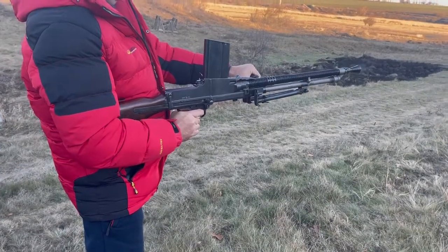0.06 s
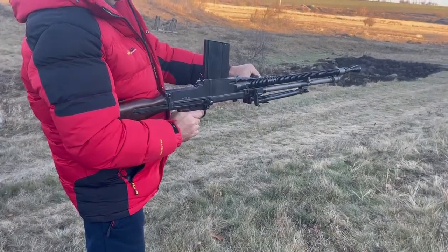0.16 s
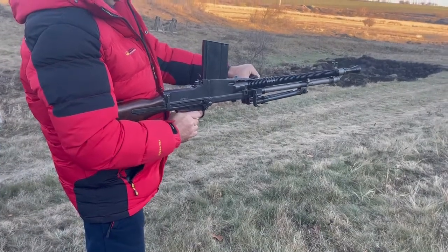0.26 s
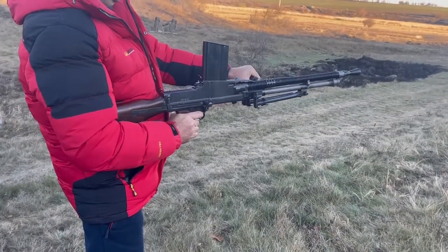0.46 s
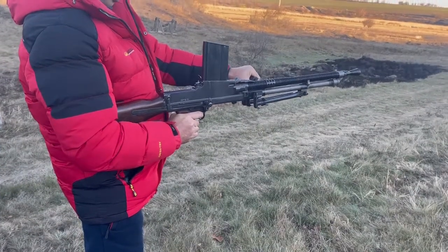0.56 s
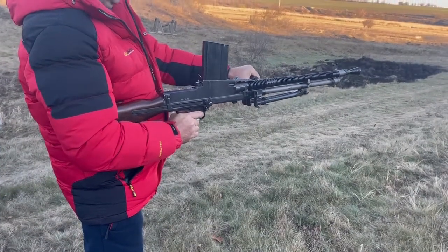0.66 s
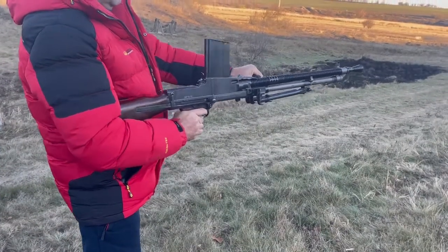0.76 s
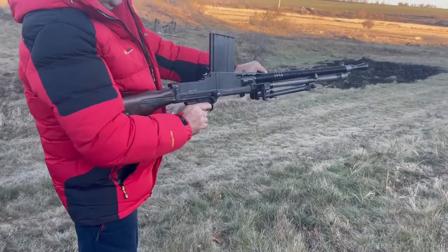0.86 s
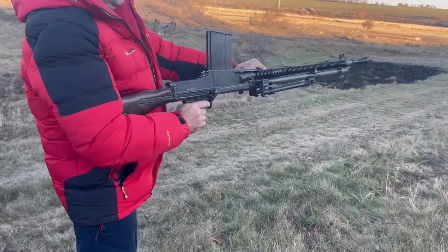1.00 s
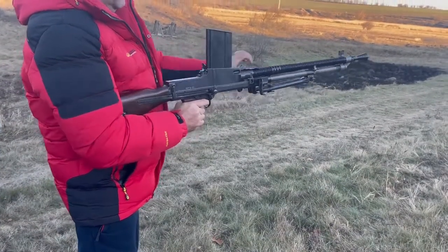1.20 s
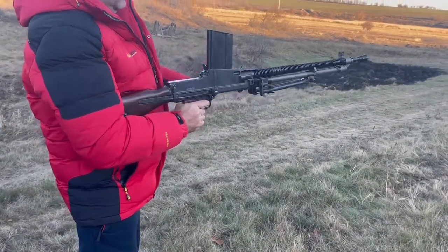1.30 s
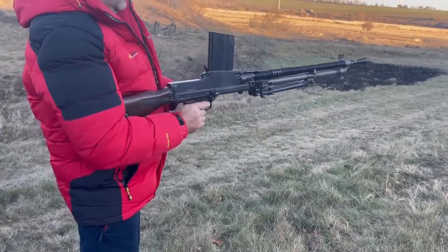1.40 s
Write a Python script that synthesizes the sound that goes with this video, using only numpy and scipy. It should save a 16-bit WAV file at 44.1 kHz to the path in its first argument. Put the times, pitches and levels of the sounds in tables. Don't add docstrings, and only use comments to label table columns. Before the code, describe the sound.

A single close machine gun shot: steel bolt clatter runs straight into one short thumping blast, then a dull echo off slopes fades quickly under low wind buffeting, heard on a phone in an open field.

```python
import sys
import numpy as np
from scipy import signal
from scipy.fft import rfft, irfft
from scipy.io import wavfile
from scipy.ndimage import uniform_filter1d, map_coordinates

SR = 44100
rng = np.random.default_rng(int(sys.argv[2]) if len(sys.argv) > 2 else 0)


def decibels_to_gain(level_db):
    exponent = np.asarray(level_db, float) / 20
    return 10 ** exponent


def wav_out(sig):
    wavfile.write(sys.argv[1], SR, np.round(np.clip(np.atleast_2d(sig).T, -1, 1) * 32767).astype(np.int16))


N = 63945

# time_s, level_db
OLD_ECHO_LEVEL = [
    (0.0, -51),
    (0.006, -49.5),
    (0.124, -64.5),
    (0.195, -61.5),
]
# time_s, level_db
ECHO_LEVEL = [
    (.30, -52.5),
    (.34, -54.5),
    (.406, -53.5),
    (.45, -44.5),
    (.51, -49.5),
    (.572, -56),
    (.66, -62),
    (.76, -71),
    (1.12, -79),
]
# frequency_hz, density_db (per Hz)
ECHO_SPECTRUM = [(180, -34), (300, -8.5), (1050, 2.5), (1280, -5.5), (2180, -4), (3590, -15.5),
                 (8730, -20.5), (11400, -43.5), (12500, -60), (16200, -92), (22000, -120)]
# frequency_hz, density_db (per Hz)
AIR_SPECTRUM = [(410, -43), (700, -10.5), (1410, -1), (1670, -12), (2170, -12.5), (8400, -24.5),
                (12500, -29), (16200, -56), (22000, -120)]
AIR_LEVEL_DB = -93.5
ECHO_DULLING_DB_S, ECHO_PATCHINESS_DB = -4.5, .8

# time_s, level_db
GUST_LEVEL = [(0, -52), (.11, -49), (.19, -45), (.34, -44), (.41, -48), (.45, -43), (.57, -54.5),
              (.64, -46), (.72, -47.5), (.80, -57.5), (.86, -63), (.96, -48.5), (1.05, -63), (1.12, -67),
              (1.17, -51), (1.29, -47), (1.34, -51.5), (1.45, -51.5)]
# frequency_hz, density_db (per Hz)
WIND_SPECTRUM = [(20, -14.5), (40, -8), (70, -1.5), (150, -2.5), (230, -11), (330, -25.5), (500, -42),
                 (900, -61)]
FLUTTER_DB = 2.5

# time_s, level_db
INSECT_LEVEL = [
    (0, -75),
    (.2, -76),
    (.35, -88),
    (.8, -95),
    (1.0, -103),
    (1.45, -115),
]
INSECT_HZ = 5324

# start_s, peak_db, pitch_hz, t60_s
EDDIES = [(.136, -37, 403, 0.035), (0.142, -32, 239, .08), (0.328, -36.5, 300, 0.18),
          (0.427, -43.5, 350, 0.11), (.51, -44, 352, 0.072), (.625, -44.5, 300, 0.077),
          (0.654, -49.5, 300, 0.11), (0.721, -47.5, 398.7, 0.047), (.739, -32, 334, 0.048),
          (0.747, -43, 316, 0.084), (0.945, -44, 300, 0.088), (0.961, -45, 370.5, 0.068),
          (1.006, -53, 300, 0.044), (1.147, -44.5, 391, 0.046), (1.18, -50.5, 250, 0.05),
          (1.214, -56, 300, 0.075), (1.243, -52.5, 333, 0.079), (1.259, -47.5, 387, 0.072),
          (1.318, -49.5, 327.4, 0.067), (1.339, -47, 440, 0.049), (1.349, -53.5, 410, 0.11),
          (1.393, -53, 373, 0.047), (1.416, -51.5, 300, 0.08)]
SLAP_RISE_S, SLAP_Q = .0023, 1

# start_s, level_db, ring_hz, t60_s
METAL_KNOCKS = [(.152, -58, 3500, .03), (.2022, -35.5, 2600, .035), (.2140, -20.5, 11000, .015),
                (.2175, -27.5, 6000, .035), (.2225, -39, 5500, .03), (.229, -36.5, 8500, .035),
                (.2365, -28.5, 8200, .05), (.2447, -12, 8800, .02), (.249, -26, 11000, .03),
                (.2565, -25, 2000, .05), (.259, -25, 6300, .04), (.2645, -25, 8600, .05),
                (.266, -23, 11200, .06), (.272, -25, 8400, .06), (.280, -28.5, 2400, .04),
                (.295, -37, 5200, .04), (.3075, -40, 3500, .05), (.318, -40, 7000, .05),
                (.833, -68, 4000, .03), (.874, -56.5, 2500, .03), (1.077, -77, 1500, .03),
                (1.4485, -70, 2000, .05)]
# frequency_hz, density_db (per Hz)
STEEL_SPECTRUM = [(350, -49.5), (600, -12.5), (1170, -1.5), (1800, -12), (2210, -6.5), (3940, -10),
                  (10000, -8.5), (11000, 0), (12300, -16.5), (16000, -45.5), (22000, -120)]
# time_s, level_db
SCRAPE_LEVEL = [
    (.200, -72),
    (.204, -44.5),
    (.24, -38),
    (.27, -32),
    (.295, -43),
    (.322, -44),
    (.330, -61.5),
    (.35, -79.5),
]
RING_Q, CRACK_DB, KNOCK_RISE_S = 6, -9.5, .0005

# time_s, pitch_hz, level_db
BLAST_SWING = [
    (.262, 620, -35.5),
    (.2675, 520, -15),
    (.2695, 330, -7),
    (.2725, 190, -7),
    (.2752, 150, -6.5),
    (.280, 95, -15.5),
    (.288, 90, -14.5),
    (.298, 80, -30),
    (.315, 70, -49.5),
]
# frequency_hz, level_db, centre_s, half_width_s
FRONT_ROAR = [
    (470, -18.5, .265, .007),
    (1030, -17.5, .264, .006),
    (1950, -25.5, .260, .005),
    (300, -22.5, .282, 0.011),
]
BLAST_ROUGHNESS = .05
HEAVE_S, HEAVE_HZ, HEAVE_DB, HEAVE_FADE_S = .2725, 38, -10, .012

# frequency_hz, gain_db
PORT_RESPONSE = [(130, -30.5), (250, -2), (600, 6.5), (2000, -9), (6000, -10), (9000, -0.5), (11000, 1.5),
                 (12500, -8)]
PORT_LAG_S, PORT_DRIFT_PER_S = .00025, -1.2
SIDE_FROM_HZ, GUN_PAN = 360, .058
ACTION_SIDE_DB, ECHO_SIDE_DB, WIND_SIDE_DB, SLAP_SIDE_DB = -5, 1, -13.5, -7.5
TOP_HZ = 11750


def line(table, col=1):
    rows = np.array(table)
    return np.interp(np.arange(N) / SR, rows[:, 0], rows[:, col])


def unit(x):
    return x / np.sqrt(np.mean(x ** 2))


def colour(x, points, floor_db=-60):
    rows = np.array(points)
    hz = np.maximum(np.fft.rfftfreq(len(x), 1 / SR), 1)
    knots_hz = np.r_[rows[0, 0] / 2, rows[:, 0], rows[-1, 0] * 2]
    knots_db = np.r_[floor_db, rows[:, 1], floor_db]
    gain_db = np.interp(np.log(hz), np.log(knots_hz), knots_db)
    return irfft(rfft(x) * decibels_to_gain(gain_db), len(x))


def band(x, hz, q):
    b, a = signal.iirpeak(min(hz, .45 * SR), max(q, .3), fs=SR)
    return signal.lfilter(b, a, x)


def walk(rate_hz):
    hold = int(SR / rate_hz)
    steps = np.repeat(rng.standard_normal(N // hold + 1), hold)
    return 1.2 * uniform_filter1d(steps, hold)[:N]


def burst(start_s, db, t60_s, rise_s):
    age = np.maximum(np.arange(N) / SR - start_s, 0)
    rise = 1 - np.exp(-(age / rise_s) ** 2)
    return rise * decibels_to_gain(db - 60 * age / t60_s)


def echoes():
    t = np.arange(N) / SR
    old = t < .25
    level = np.where(old, line(OLD_ECHO_LEVEL), line(ECHO_LEVEL))
    age = np.where(old, t, t - .3)
    wash = unit(colour(rng.standard_normal(N), ECHO_SPECTRUM))
    out = np.zeros(N)
    for octave in range(6):
        centre_hz = 350 * 2 ** octave
        edges = [centre_hz / 1.414, min(centre_hz * 1.414, .45 * SR)]
        part = signal.sosfilt(signal.butter(2, edges, "bandpass", fs=SR, output="sos"), wash)
        dulling = ECHO_DULLING_DB_S * octave * (age - .4031)
        out += part * decibels_to_gain(level + dulling + ECHO_PATCHINESS_DB * walk(40))
    return out + decibels_to_gain(AIR_LEVEL_DB) * unit(colour(rng.standard_normal(N), AIR_SPECTRUM))


def wind():
    rumble = colour(rng.standard_normal(N), WIND_SPECTRUM)
    total = np.zeros(N)
    for hz in 30 * 2. ** np.arange(5):
        total += band(rumble, hz, 1.5) * decibels_to_gain(FLUTTER_DB * walk(30))
    return unit(total) * decibels_to_gain(line(GUST_LEVEL))


def insect():
    tone = np.sin(2 * np.pi * INSECT_HZ * np.arange(N) / SR)
    return np.sqrt(2) * decibels_to_gain(line(INSECT_LEVEL) + 1.5 * walk(25)) * tone


def slaps():
    noise = rng.standard_normal(N)
    out = np.zeros(N)
    for start_s, db, hz, t60_s in EDDIES:
        rough = band(band(noise, hz, SLAP_Q), hz, SLAP_Q)
        eddy = np.tanh(1.9 * unit(rough))
        out += burst(start_s, db, t60_s, SLAP_RISE_S) * eddy
    return signal.sosfilt(signal.butter(4, 800, fs=SR, output="sos"), out)


def action():
    noise = rng.standard_normal(N)
    crack = unit(colour(noise, STEEL_SPECTRUM))
    sliding = np.abs(np.arange(N) / SR - .275) < .075
    out = crack * decibels_to_gain(line(SCRAPE_LEVEL) + 5 * walk(700)) * sliding
    for start_s, db, hz, t60_s in METAL_KNOCKS:
        struck = unit(band(noise, hz, RING_Q)) + decibels_to_gain(CRACK_DB) * crack
        out += burst(start_s, db, t60_s, KNOCK_RISE_S) * struck
    return out


def blast():
    t = np.arange(N) / SR
    log_pitch = line([(s, np.log(hz)) for s, hz, _ in BLAST_SWING])
    hz = np.exp(log_pitch) * (1 + BLAST_ROUGHNESS * walk(600))
    turns = np.cumsum(hz) / SR
    crest = np.interp(BLAST_SWING[4][0], t, turns)
    on = (t > BLAST_SWING[0][0]) & (t < BLAST_SWING[-1][0])
    out = on * decibels_to_gain(line(BLAST_SWING, col=2)) * np.cos(2 * np.pi * (turns - crest))
    age = np.maximum(t - HEAVE_S, 0)
    out += decibels_to_gain(HEAVE_DB) * np.exp(-age / HEAVE_FADE_S) * np.sin(2 * np.pi * HEAVE_HZ * age)
    for roar_hz, db, centre_s, half_width_s in FRONT_ROAR:
        roar = unit(band(rng.standard_normal(N), roar_hz, 2.3))
        out += decibels_to_gain(db) * roar * np.exp(-((t - centre_s) / half_width_s) ** 2)
    return out


def ports(x):
    t = np.arange(N) / SR
    half_lag = PORT_LAG_S * (1 + PORT_DRIFT_PER_S * np.clip(t - .27, -.1, .1)) / 2
    early = map_coordinates(x, [(t + half_lag) * SR], mode="nearest")
    late = map_coordinates(x, [(t - half_lag) * SR], mode="nearest")
    return colour(early - late, PORT_RESPONSE, floor_db=-61)


def scene():
    gun, air, tone = action() + blast(), wind(), insect()
    loose = decibels_to_gain(ACTION_SIDE_DB) * action() + decibels_to_gain(WIND_SIDE_DB) * air + decibels_to_gain(SLAP_SIDE_DB) * slaps()
    loose += .7 * tone + GUN_PAN * gun
    loose = signal.sosfilt(signal.butter(6, SIDE_FROM_HZ, "highpass", fs=SR, output="sos"), loose)
    side = ports(gun) + decibels_to_gain(ECHO_SIDE_DB) * ports(echoes()) + loose
    mid = gun + echoes() + air + slaps() + tone
    return np.array([mid + side, mid - side])


def roll_off(x):
    return signal.sosfilt(signal.butter(12, 13050, fs=SR, output="sos"), x)


def record(dry):
    rounded = np.tanh(.8 * dry) / .8
    mix = signal.sosfilt(signal.ellip(8, .3, 42, TOP_HZ, fs=SR, output="sos"), rounded)
    return roll_off(mix)


dry = scene()
out = record(dry)
wav_out(out)
```